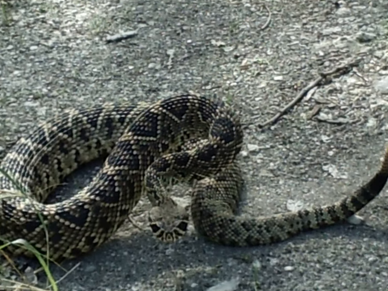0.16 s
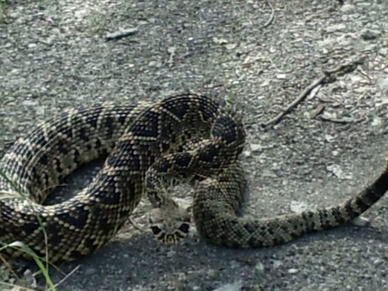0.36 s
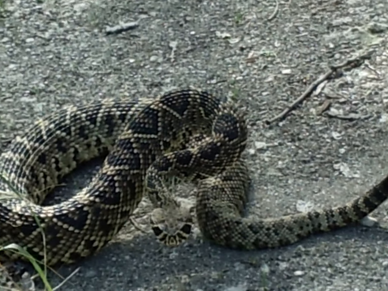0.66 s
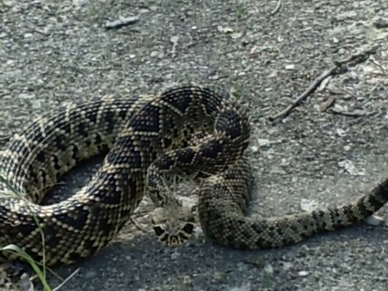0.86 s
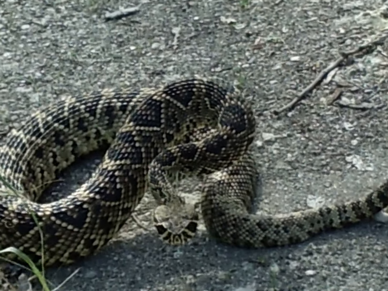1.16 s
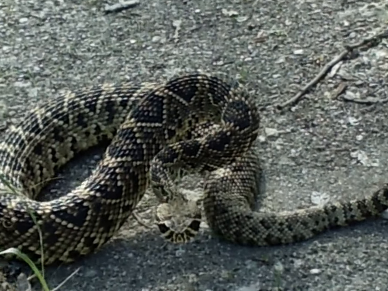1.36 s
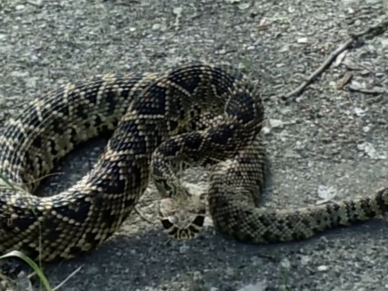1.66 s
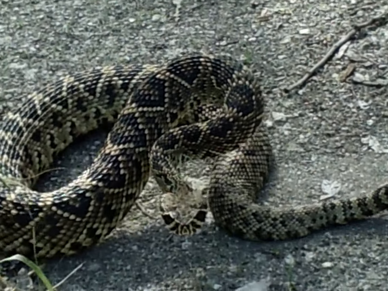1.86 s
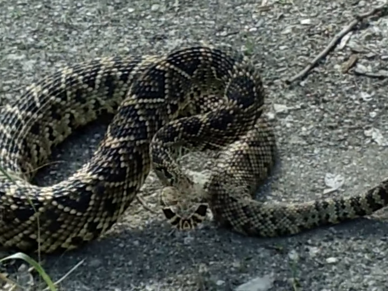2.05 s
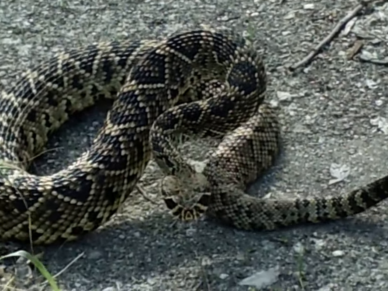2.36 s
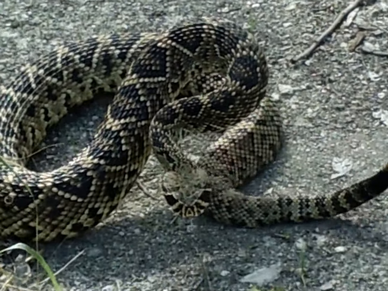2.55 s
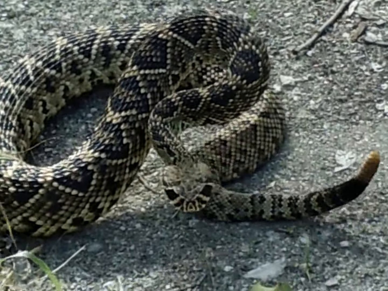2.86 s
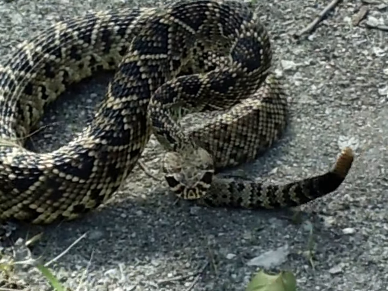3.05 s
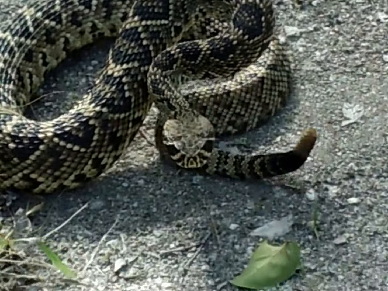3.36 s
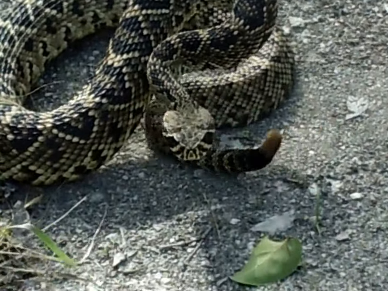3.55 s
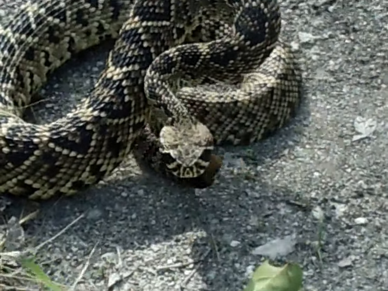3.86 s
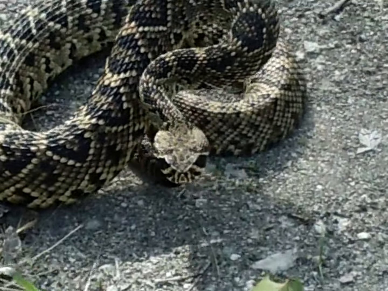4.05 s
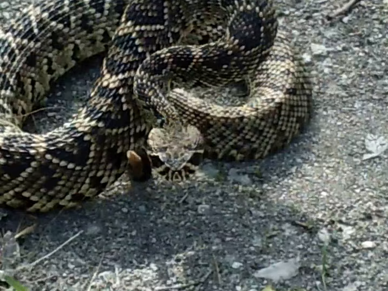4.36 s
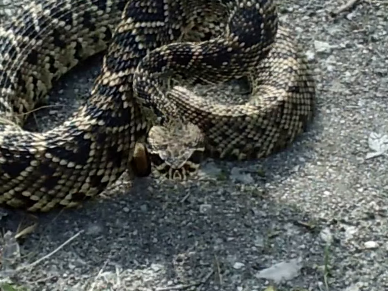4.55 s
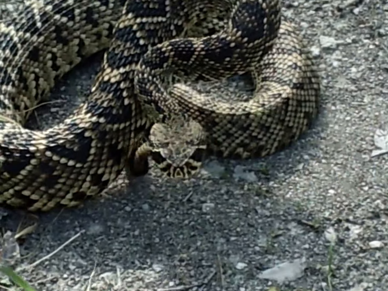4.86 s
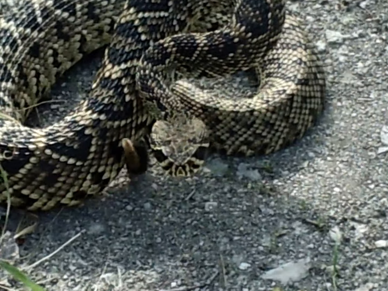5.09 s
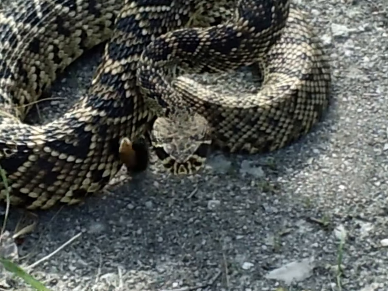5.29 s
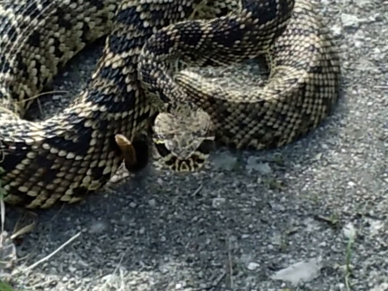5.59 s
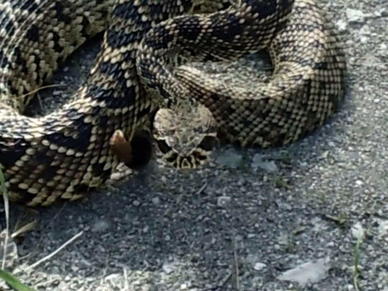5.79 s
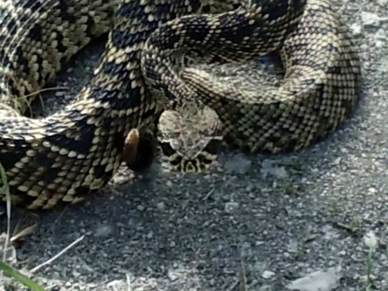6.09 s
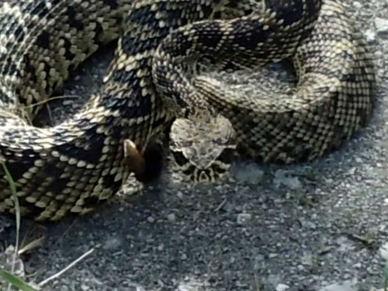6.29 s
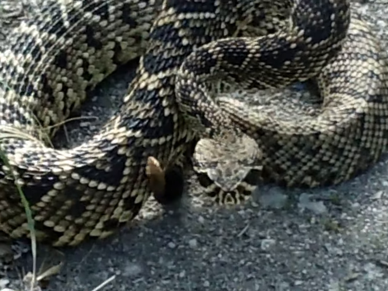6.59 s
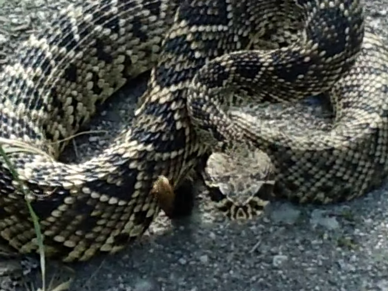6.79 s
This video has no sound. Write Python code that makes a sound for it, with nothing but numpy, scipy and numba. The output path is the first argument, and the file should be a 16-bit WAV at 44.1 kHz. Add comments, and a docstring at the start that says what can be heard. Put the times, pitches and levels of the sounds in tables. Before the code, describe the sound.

A coiled rattlesnake shakes its tail close by in a continuous dry, bright buzz, over very faint outdoor air.

```python
"""A dry, bright buzz: a coiled rattlesnake shakes its tail on pavement, close by.
At each turn of the tail the loose horny segments knock together and ring; when the tail slows they
fall out of step and the whole rattle flops, about 33 times a second. From midway the tail is drawn
in against the coils, which changes its colour. Underneath: faint air, wind puffs, three ticks."""
import sys
import numpy as np
from scipy import signal
from scipy.fft import rfft, irfft
from scipy.io import wavfile
from scipy.ndimage import uniform_filter1d
from numba import njit

SR = 44100
rng = np.random.default_rng(int(sys.argv[2]) if len(sys.argv) > 2 else 0)


def generate_wav(sig):
    """Save sig (samples, or channels by samples) to the path in sys.argv[1] as 16-bit PCM at SR."""
    pcm = np.round(np.clip(np.atleast_2d(sig).T, -1, 1) * 32767).astype(np.int16)
    wavfile.write(sys.argv[1], SR, pcm)


N = 305613

# tail speed, two turns per full shake: (time [s], turn rate [Hz])
TAIL_SPEED = [(0, 141), (.65, 147), (.85, 153), (1.25, 155), (1.85, 164.5), (2.9, 156), (4.2, 161),
              (5.35, 148.5), (5.85, 149), (6.05, 154), (6.93, 152)]


def undb(db):
    """Decibels to gain."""
    return 10 ** (np.asarray(db) / 20)


def unit(x):
    """Scale to rms 1."""
    return x / np.sqrt(np.mean(x ** 2))


def curves(table):
    """Value columns of a (time [s], ...) table, interpolated per sample."""
    times_s, *columns = np.transpose(table)
    return [np.interp(np.arange(N) / SR, times_s, column) for column in columns]


def drift(rate_hz):
    """Smooth random drift, rms 1."""
    hold = int(SR / rate_hz)
    steps = np.repeat(rng.standard_normal(N // hold + 1), hold)
    return unit(uniform_filter1d(steps, hold)[:N])


def swell(at_s, sigma_s):
    """Gaussian rise and fall, peak 1."""
    return np.exp(-.5 * ((np.arange(N) / SR - at_s) / sigma_s) ** 2)


def butter(x, hz, kind, order=3):
    """Low-pass or high-pass."""
    return signal.sosfilt(signal.butter(order, hz, kind, fs=SR, output="sos"), x)


def colour(x, spectrum):
    """Ring x through a minimum-phase body given as (frequency [Hz], gain [dB]); output rms 1."""
    hz, db = np.transpose(spectrum)
    bins_hz = np.maximum(np.arange(N + 1) * SR / (2 * N), 1)
    gain = undb(np.interp(np.log(bins_hz), np.log(hz), db))
    cepstrum = irfft(np.log(gain))
    cepstrum[1:N] *= 2
    cepstrum[N + 1:] = 0
    response = np.exp(rfft(cepstrum))
    return unit(irfft(rfft(x, 2 * N) * response)[:N])


@njit
def resonance(x, hz, width_hz):
    """State-variable band-pass, gain 1 at its moving centre."""
    y = np.empty(len(x))
    band_state, low_state = 0., 0.
    for i in range(len(x)):
        g, damping = np.tan(np.pi * hz[i] / SR), width_hz / hz[i]
        band = (band_state + g * (x[i] - low_state)) / (1 + g * (g + damping))
        band_state = 2 * band - band_state
        low_state += 2 * g * band
        y[i] = damping * band
    return y


def bell(x, hz, width_hz, db):
    """Boost or cut one band; centre and gain may move."""
    return x + (undb(db) - 1) * resonance(x, hz * np.ones(N), float(width_hz))


def rumble(hz):
    """Two octaves of noise around hz, rms 1."""
    noise = butter(rng.standard_normal(N), hz / 2, "high")
    return unit(butter(noise, hz * 2, "low", order=4))


def outdoors(air_db=-56, breeze_db=-63, breeze_hz=22, gust_db=3, puff_sigma_s=.046):
    """Soft air, a fitful breeze on the microphone and a few stronger puffs."""
    # (frequency [Hz], relative level [dB])
    air_spectrum = [(20, -1), (70, -1.5), (130, -6.5), (200, -11.5), (330, -17), (600, -21.5), (1020, -24),
                    (1220, -20.5), (1500, -25), (4000, -36), (15000, -40)]
    # (time [s], level [dB], centre [Hz])
    puffs = [(1.14, -52, 26), (1.4, -48, 27), (1.61, -48.5, 27), (1.97, -50, 27), (3.16, -46, 22),
             (5.37, -47.5, 55)]
    out = colour(rng.standard_normal(N), air_spectrum) * undb(air_db + .46 * drift(3.07))
    out += rumble(breeze_hz) * undb(breeze_db + gust_db * drift(6))
    for at_s, db, hz in puffs:
        out += rumble(hz) * undb(db) * swell(at_s, puff_sigma_s)
    return out


def ticks(decay_s=.0023):
    """Small dry ticks: brief crunches into broad resonances."""
    # (time [s], peak [dB])
    events = [(3.0541, -35), (3.926, -46), (6.445, -43)]
    # (centre [Hz], width [Hz], relative gain [dB])
    modes = [(450, 400, 5), (1150, 650, 3), (1850, 900, -10)]
    t, out = np.arange(N) / SR, np.zeros(N)
    for at_s, peak_db in events:
        envelope = (t >= at_s) * np.exp(-np.abs(t - at_s) / decay_s)
        crunch = rng.standard_normal(N) * envelope + 1e-18
        tick = sum(undb(db) * resonance(crunch, np.full(N, float(hz)), float(width_hz))
                   for hz, width_hz, db in modes)
        out += tick / np.abs(tick).max() * undb(peak_db)
    return out


def slackness(in_step_hz=157, loosen_hz=5):
    """Tail's lag below its in-step speed [Hz] and the resulting slack of the segments [0-1]."""
    lag_hz = np.maximum(in_step_hz - curves(TAIL_SPEED)[0], 0)
    return lag_hz, np.minimum(lag_hz / loosen_hz, 1)


def knocks(phase_turns, astray_share, count=24, spread_turns=.11, lead_turns=.35, early_share=.48):
    """Segments collide in a cluster at each turn; some hit early, strays at any time."""
    turn = np.arange(int(phase_turns[-1]) + 2)[:, None]
    shape = (len(turn), count)
    early = rng.random(shape) < early_share
    offset_turns = spread_turns * rng.standard_normal(shape) * (1 + .5 * early) - lead_turns * early
    astray = rng.random(shape) < np.interp(turn, phase_turns, astray_share)
    when_turns = turn + np.where(astray, rng.random(shape), offset_turns)
    polarity = rng.choice([-1, 1], shape)
    strength = polarity * undb(2 * rng.standard_normal(shape) - early)  # early hits 1 dB softer
    sample = np.searchsorted(phase_turns, when_turns)
    inside = (sample > 0) & (sample < N)
    impulses = np.bincount(sample[inside], strength[inside], N)
    tumble_db = 2 * astray_share * drift(200)  # loose segments knock in uneven bunches
    return unit(impulses * undb(tumble_db))


def shaking(scrape_db=-7, flop_hz=35.1, flop_sag=.2878, split_hz=5500, sheen_hz=8500):
    """Drive force: knocks of three segment sizes plus scraping, pulsed by the flop."""
    lag_hz, slack = slackness()
    astray_share = np.interp(slack, [0, 1], [.1, .62])
    turn_hz = curves(TAIL_SPEED)[0] * (1 + .02 * drift(60))
    phase_turns = np.cumsum(turn_hz) / SR
    flop_rate_hz = (flop_hz - flop_sag * lag_hz) * (1 + .075 * drift(25))
    flop = np.sin(2 * np.pi * np.cumsum(flop_rate_hz) / SR)
    wide = butter(knocks(phase_turns, astray_share), split_hz, "low")
    middle = butter(knocks(phase_turns, astray_share), split_hz, "high")
    middle = butter(middle, sheen_hz, "low")
    small = butter(knocks(phase_turns, astray_share, count=32), sheen_hz, "high")
    force = wide + middle + small + undb(scrape_db) * rng.standard_normal(N)
    # once a flop the segments fly free and fall quiet
    flight = ((1 + flop) / 2) ** 2
    flop_depth = np.clip(.05085 + .04294 * lag_hz, 0, 1)
    force *= 1 - flop_depth * flight
    # a loose rattle also loses contact at odd moments
    gap_db = -3.06 * astray_share * np.maximum(drift(300), 0) ** 2
    force *= undb(gap_db)
    # flop and gaps only redistribute the tail's energy
    return force / np.sqrt(uniform_filter1d(force ** 2, size=4000))


def ground_bounce(ring, sway_db=.74, notch_ratio=.865, max_cut_db=3.5):
    """The pavement reflection lifts one band, unsteadily as the tail sways, and cuts one below it."""
    # (time [s], centre [Hz], boost [dB])
    bright_band = [(0, 6530, 3), (1.8, 6330, 1.6), (3.75, 6100, -0.5), (4.04, 6300, 6.5), (4.25, 6650, 4),
                   (4.45, 7400, 10), (4.85, 7500, 0), (5.6, 6350, 0), (6.93, 6500, 2.5)]
    centre_hz, boost_db = curves(bright_band)
    cut_db = np.minimum(1.4 * boost_db, max_cut_db)
    ring = bell(ring, centre_hz, width_hz=850, db=boost_db + sway_db * drift(10))
    return bell(ring, notch_ratio * centre_hz, width_hz=700, db=-cut_db)


def rattle(waver_db=.38):
    """Shaking rings the hollow segments; the tail's position colours the sound."""
    # shaking strength: (time [s], level [dB])
    effort = [(0, -29.5), (.6, -28), (.8, -27), (1.25, -25.5), (1.7, -23), (2.35, -24), (3.8, -23.5),
              (4.02, -23.5), (4.11, -26.5), (4.29, -24), (4.38, -25.5), (4.5, -24.5), (4.9, -23.5),
              (5.35, -25), (5.75, -25), (6.08, -22.5), (6.55, -22.5), (6.72, -23.5)]
    # segment ring, tail held out: (frequency [Hz], relative gain [dB])
    held_out_spectrum = [(880, -44), (1500, -46), (2720, -27), (3580, -12), (4310, -5.5), (5190, -7),
                         (6310, 1.5), (6690, -2), (7300, -11), (8290, -14.5), (9330, -22.5), (10300, -21),
                         (11500, -23.5), (12600, -20), (15500, -35)]
    # segment ring, tail against the coils: (frequency [Hz], relative gain [dB])
    tucked_spectrum = [(880, -68), (1500, -39.5), (2590, -35), (3280, -17.5), (4570, -1.5), (5950, -6),
                       (6430, -8), (6960, -11), (7520, -13.5), (8210, -15), (8970, -23), (10100, -19),
                       (11400, -28.5), (12800, -21.5), (15500, -35)]
    # (time [s], share tucked in [0-1])
    tail_pose = [(0, 0.33), (3, 0.15), (3.8, 0.33), (4.25, 0.53), (6.1, 1)]
    force = shaking()
    tucked = np.clip(curves(tail_pose)[0], 0, 1)
    ring = (1 - tucked) * colour(force, held_out_spectrum) + tucked * colour(force, tucked_spectrum)
    ring = bell(ring, 4680, width_hz=430, db=3)  # one shell mode rings a little longer
    # segments in step hit harder
    in_step = 1 - slackness()[1]
    sheen_db = np.interp(in_step, [0, 1], [-.3, .6])
    body_db = np.interp(in_step, [0, 1], [-5.5, 1])
    behind_head = swell(at_s=4.35, sigma_s=.21)
    ring = bell(ring, 11100, width_hz=5000, db=sheen_db + 2.5 * behind_head)
    ring = bell(ring, 1900, width_hz=680, db=body_db)
    ring = bell(ring, 2600, width_hz=800, db=-5.5 * behind_head)
    ring = ground_bounce(ring)
    return unit(ring) * undb(curves(effort)[0] + waver_db * drift(22))


def scene():
    """The snake over its surroundings, mono."""
    return (rattle() + outdoors() + ticks())[None]


def record(dry, top_hz=15700):
    """Steep elliptic low-pass."""
    return signal.sosfilt(signal.ellip(12, .1, 90, top_hz, fs=SR, output="sos"), dry)


dry = scene()
out = record(dry)
generate_wav(out)
```